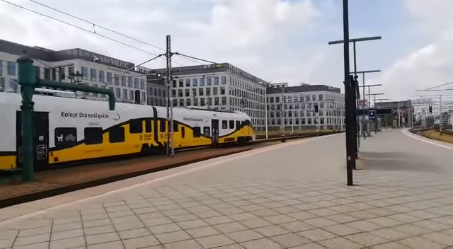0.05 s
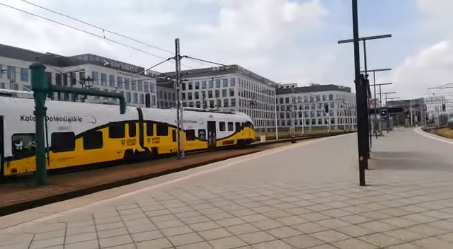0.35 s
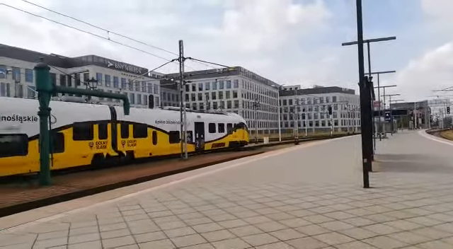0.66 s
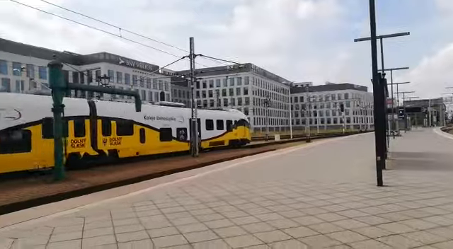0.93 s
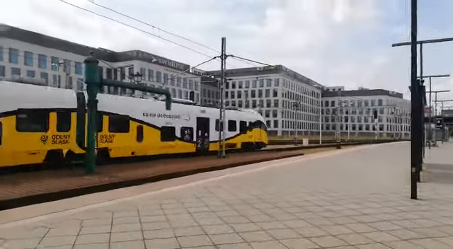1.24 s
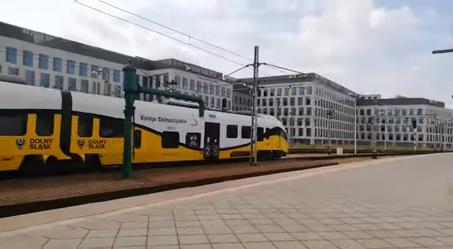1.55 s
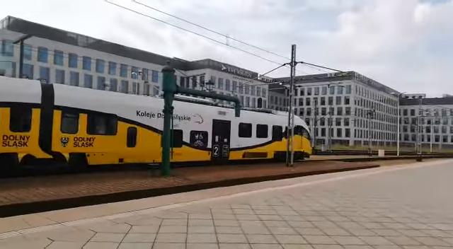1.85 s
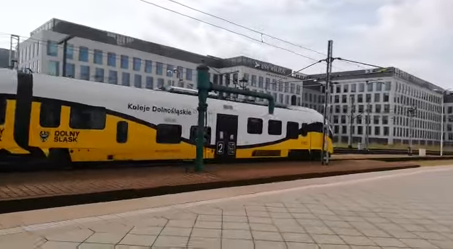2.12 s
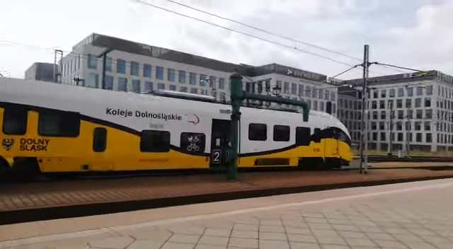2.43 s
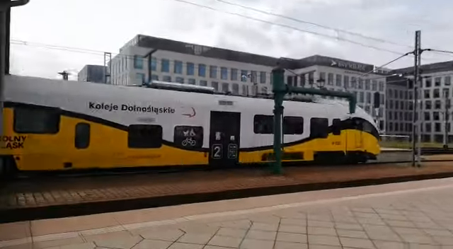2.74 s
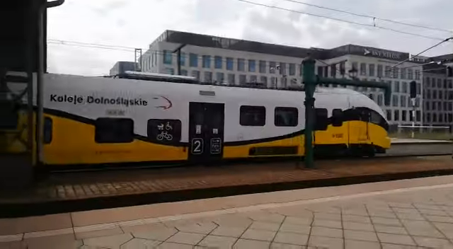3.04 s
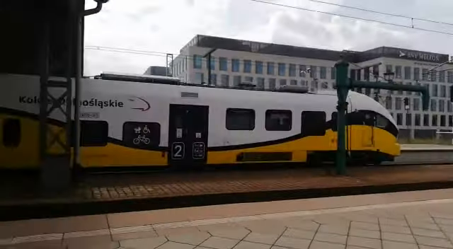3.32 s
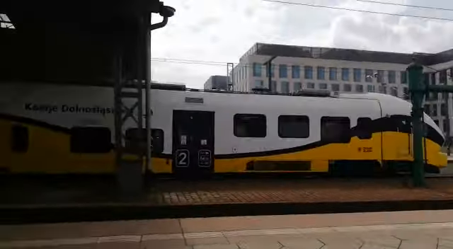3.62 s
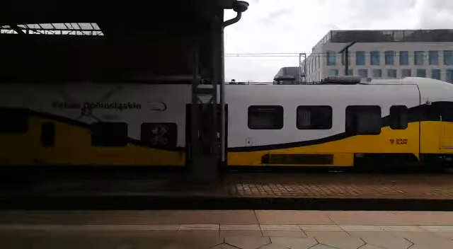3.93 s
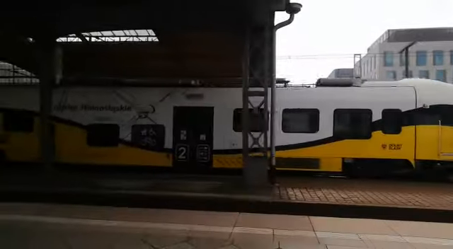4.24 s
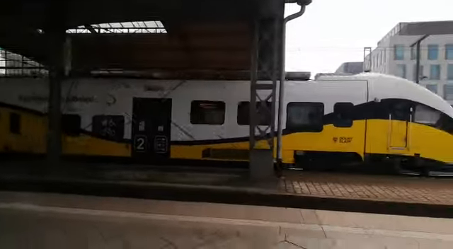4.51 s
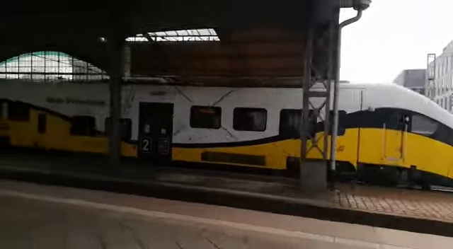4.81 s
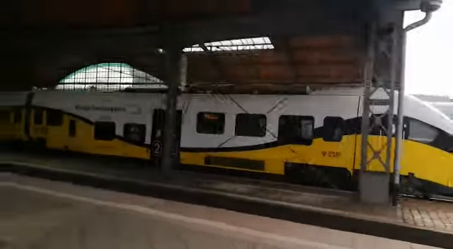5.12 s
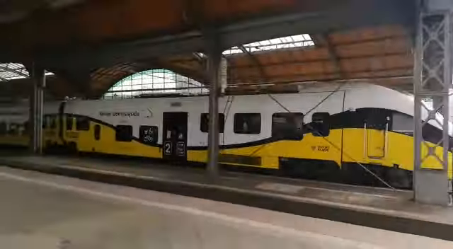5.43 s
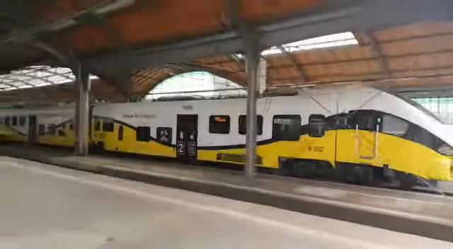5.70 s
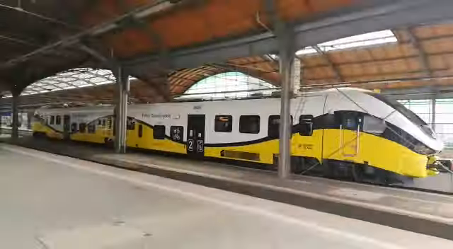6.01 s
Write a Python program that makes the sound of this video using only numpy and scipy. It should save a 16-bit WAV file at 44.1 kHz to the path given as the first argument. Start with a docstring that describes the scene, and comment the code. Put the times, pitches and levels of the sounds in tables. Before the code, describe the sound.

An electric train rolls slowly past a station platform, with a steady low rumble and a faint hum and whine throughout. At about 0.1 seconds a loud blast of compressed air hisses with a high metallic squeal, lasting until 0.5. A weaker, short burst comes around 1 second. Another strong blast runs from 1.8 to 2.3 seconds, with squeals shifting in pitch, followed by a quick burst at 2.5. The longest blast lasts from 2.7 to 3.3 seconds, hissing and squealing on several high tones. Each one echoes for about a second in the hall, and the rumble dips beneath it, then comes back. Two soft, dull jolts follow at about 3.7 and 4 seconds. The rumble carries on evenly to the end, a little after 6 seconds, with one tiny, faint spit of air at 5.5.

```python
"""Train venting air in a station

An electric train rolls slowly past a platform into a hall, with a steady rumble and a faint whine.
A valve vents compressed air in short blasts: the turbulent jet hisses and drives the outlet pipe,
which squeals on overtones about 1 kHz apart. The hall reverberates after each blast, and an
automatic gain control ducks the rumble under it."""
import sys
import numpy as np
from scipy import signal
from scipy.fft import rfft, irfft, next_fast_len
from scipy.io import wavfile
from scipy.ndimage import uniform_filter1d

SR = 44100
rng = np.random.default_rng(int(sys.argv[2]) if len(sys.argv) > 2 else 0)


def waveform_to_disk(signal):
    """Save audio, clipped to [-1, 1], as 16-bit WAV at the path in sys.argv[1]."""
    frames = np.transpose(np.atleast_2d(signal))
    scaled = np.clip(frames, -1, 1) * 32767
    samples = np.round(scaled).astype(np.int16)
    wavfile.write(sys.argv[1], SR, samples)


N = 275977
TIME = np.arange(N) / SR

# Noise of wheels, motors and fans: (frequency [Hz], relative spectral density [dB])
RUMBLE_SPECTRUM = [(14, -42), (24, -21), (42, 1), (136, -3.5), (178, -1), (483, -13.5), (668, -11.5),
                   (1180, -8.5), (1870, -14), (2580, -14.5), (3770, -12.5), (5080, -16), (6480, -27.5),
                   (8730, -26), (11500, -42), (15400, -51)]
# Hum and whine of the drive and running gear: (frequency [Hz], bandwidth [Hz], level [dB])
DRIVE_RESONANCES = [(170.4, 66, -36), (300.8, 84, -39.5), (716.5, 310, -41), (1192, 44, -41),
                    (2030, 310, -41)]
# Jolts on uneven track: (mid time [s], centre frequency [Hz], level [dB])
TRACK_JOLTS = [(3.72, 150, -30.5), (3.96, 796, -31.5)]
# Reverberation of the hall: (frequency [Hz], time to decay by 60 dB [s])
HALL_DECAY = [(500, 1.68), (2000, 1.26), (5000, 0.97), (9000, 0.86), (14000, 0.55)]
# Low resonances set off by some blasts: (start [s], end [s], frequency [Hz], level [dB])
LOW_RESONANCES = [(1.027, 1.485, 2370, -26.5), (2.12, 2.27, 1234, -18), (2.47, 2.68, 999, -24)]
# Modes of the valve's housing: (frequency [Hz], bandwidth [Hz], level re flow [dB])
HOUSING_MODES = [(1183, 136, -26.5), (2360, 240, -26.5)]
# Blasts of air: (opening [s], shutting [s], first level [dB], last level [dB], rise time [s],
# pipe excitation re flow [dB], pipe tuning [cents], left minus right [dB])
AIR_BLASTS = [(.124, 0.472, 1.5, -5, 0.027, -2.5, 13, -0.5), (0.921, .961, -19, -28, 0.014, 3, 10, 3),
              (1.025, 1.151, -5, -6, 0.03, -3.5, -8.5, 6), (1.833, 2.303, 2, -3.5, 0.046, 2.5, 13, -0.5),
              (2.445, 2.534, -2, -4, 0.026, 3.5, 5, 0), (2.741, 3.347, 4, -3, 0.061, -1, -1, -1),
              (5.491, 5.514, -22, -21, 0.0036, 6, 5.5, -0.5)]
# Hiss of the free jet: (frequency [Hz], relative spectral density [dB])
JET_SPECTRUM = [(200, -63), (700, -24), (1650, -16), (2150, -2), (2850, -7), (3400, -4.5), (4200, 0.5),
                (5200, 3), (6500, -9), (8500, -5), (9700, -5), (10700, -22), (12700, -23), (15000, -26)]
# Overtones 1 to 14 of the outlet pipe: (frequency [Hz])
OVERTONE_HZ = [1015, 2035, 3050, 3955, 4985, 6025, 7050, 8120, 9130, 10150, 11210, 12090, 13150, 14200]
# Strength of those overtones: (relative level [dB])
OVERTONE_DB = [-14, -12.5, -10, -5, -0.5, -1.5, -2, 1, -0.5, -14, -14.5, -22, -14, -20]
# Strongest squeals: (start [s], end [s], overtone [number], relative level [dB], left minus right [dB])
PIPE_SQUEALS = [(0.12, 0.235, 8, -4, -19), (1.038, 1.197, 9, -2, 6.5), (1.842, 1.96, 5, -3, -9),
                (1.947, 2.183, 4, -5, -10), (2.098, 2.329, 7, -2, -5), (2.743, 3.333, 5, -6, -3.5),
                (2.836, 3.287, 9, -9.5, 0), (3.184, 3.29, 6, -11.5, 8)]
# Likeness of the train's sound at the two microphone ports: (frequency [Hz], coherence [0-1])
PORT_COHERENCE = [(61, 1), (131, 0.97), (291, 0.89), (601, 0.3), (1401, 0.35), (3001, 0.42), (9000, 0)]
# Unequal response of the ports: (frequency [Hz], left minus right [dB])
PORT_BALANCE = [(111, -.1), (381, -.9), (701, 3.5), (1291, -2), (2381, -5), (4401, -10.5), (6001, -6.5),
                (7501, 2.5), (9301, 0), (12001, -0.5), (14501, -19)]


def amp(db):
    """Amplitude ratio of a level in decibels."""
    return 10 ** (np.asarray(db) / 20)


def unit_rms(x):
    """Normalisation to an rms of 1."""
    return x / np.sqrt(np.mean(x ** 2) + 1e-20)


def curve_at(points, hz):
    """Interpolation of a table on a logarithmic frequency axis."""
    f, value = np.transpose(points)
    return np.interp(np.log(hz + 1), np.log(f + 1), value)


def filtered(x, gain):
    """Linear filtering: the spectrum is multiplied by gain(frequency)."""
    size = next_fast_len(N + 4096)
    return irfft(rfft(x, size) * gain(np.fft.rfftfreq(size, 1 / SR)), size)[..., :N]


def coloured_noise(gain):
    """Spectral shaping of white noise, at rms 1."""
    return unit_rms(filtered(rng.standard_normal(N), gain))


def drift(rate_hz):
    """Random fluctuation: low-pass noise of rms 1."""
    return coloured_noise(lambda f: 1 / (1 + (f / rate_hz) ** 4))


def resonance(hz, width_hz):
    """Random excitation of a resonance that may glide; the width lies between the -6 dB points."""
    phase = 2 * np.pi * np.cumsum(hz * np.ones(N)) / SR
    pole = np.exp(-np.pi * abs(width_hz) / SR)
    envelope = signal.lfilter([1], [1, -2 * pole, pole * pole], rng.standard_normal((2, N)))
    return unit_rms(envelope[0] * np.cos(phase) + envelope[1] * np.sin(phase))


def whistle(hz, waver_hz=35, shake_db=3.5):
    """Random frequency and amplitude modulation of a sine tone."""
    phase = 2 * np.pi * np.cumsum(hz + waver_hz * drift(85)) / SR
    return np.sqrt(2) * np.sin(phase) * amp(shake_db * drift(32))


def swell(start, end):
    """Amplitude envelope with a rounded rise and fall."""
    return np.sqrt(np.sin(np.pi * np.clip((TIME - start) / (end - start), 0, 1)).clip(0))


def placed(x, lag_s=0., balance_db=0.):
    """Localisation by time and level difference; the right port lags."""
    return np.array([x * amp(balance_db / 2), np.interp(TIME - lag_s, TIME, x) * amp(-balance_db / 2)])


def rolling(level_db=-25.5, abreast_s=4.2, speed_m_per_s=3.2, distance_m=14, patchy_db=0.86,
            throb_db=0.13):
    """Cylindrical spreading: above a low rumble, the wheels' roar falls off as from a line source."""
    frames, hz = N // 256 + 5, np.fft.rfftfreq(1024, 1 / SR)
    left_re, left_im, other_re, other_im, patches = rng.standard_normal((5, frames, len(hz)))
    t = np.arange(frames) * 256 / SR
    range_ratio = np.hypot(1, speed_m_per_s * (t - abreast_s) / distance_m)
    roar_db = -1.15 - 10 * np.log10(range_ratio)
    treble = hz ** 2 / (hz ** 2 + 450 ** 2)
    field_db = np.outer(roar_db, treble)
    field_db += patchy_db * unit_rms(uniform_filter1d(uniform_filter1d(patches, 12, 0), 10, 1))
    field_db += throb_db * np.outer(np.interp(t, TIME, drift(9.9)), 1 - treble)
    lead = 2 * np.pi * hz * (hz > 300) * 26 / SR  # the roar reaches the right port 26 samples early
    coherence = np.clip(curve_at(PORT_COHERENCE, hz), 0, .999)
    left, other = left_re + 1j * left_im, other_re + 1j * other_im
    right = (coherence * left + np.sqrt(1 - coherence ** 2) * other) * np.exp(1j * lead)
    spectra = np.array([left, right]) / np.sqrt(1 + coherence * np.cos(lead)) * amp(field_db)
    noise = signal.istft(spectra, nperseg=1024, noverlap=768, time_axis=1, freq_axis=2)[1][:, :N]
    noise = filtered(noise, lambda f: amp(curve_at(RUMBLE_SPECTRUM, f)))
    return amp(level_db) * noise / noise.mean(0).std()


def drive():
    """Resonance of the drive and running gear; only the low hum is coherent between the ports."""
    out = np.zeros((2, N))
    for hz, width, db in DRIVE_RESONANCES:
        coherence = np.clip(curve_at(PORT_COHERENCE, hz), 0, 1) * (hz < 400)
        left, other = resonance(hz, width), resonance(hz, width)
        out += amp(db) * np.array([left, coherence * left + np.sqrt(1 - coherence ** 2) * other])
    return out


def jolts(length_s=.14, relative_width=1.1):
    """Transient excitation: uneven track jolts the running gear into dull surges of noise."""
    return sum(amp(db) * swell(s - length_s / 2, s + length_s / 2) * resonance(hz, relative_width * hz)
               for s, hz, db in TRACK_JOLTS)


def hall(x, delay_s=0.0068):
    """Reverberation: dense reflections from roof, platform and train decay, the treble first."""
    hz, t, spectra = signal.stft(rng.standard_normal((2, SR * 3 // 2)), SR, nperseg=256)
    decay = 1000 ** (-t / curve_at(HALL_DECAY, hz)[:, None])
    tail = signal.istft(spectra * decay, SR, nperseg=256)[1]
    tail *= np.clip(np.arange(tail.shape[1]) / SR / delay_s - 1, 0, 1)
    return signal.fftconvolve(x, tail / np.linalg.norm(tail[0]), axes=1)[:, :N]


def low_notes(relative_width=0.066):
    """Diffuse arrival: short, fuzzy resonances reach the two ports uncorrelated."""
    return sum(amp(db) * swell(start, end)
               * np.array([resonance(hz, relative_width * hz) for _ in range(2)])
               for start, end, hz, db in LOW_RESONANCES)


def housing(flow):
    """Forced vibration: the valve's housing rings while air flows."""
    return flow * sum(amp(db) * resonance(hz, width) for hz, width, db in HOUSING_MODES)


def valve(shut_s=0.0083, sag_cents_per_s=13):
    """Exponential rise and decay of the flow at each blast, during which the pipe's pitch sags."""
    flow, excitation, cents, side_db = np.zeros((4, N))
    for opens, shuts, first_db, last_db, rise_s, pipe_db, tuning, balance_db in AIR_BLASTS:
        opening = 1 - np.exp(-np.maximum(TIME - opens, 0) / rise_s)
        closing = np.exp(-np.maximum(TIME - shuts, 0) / shut_s)
        blast = opening * closing * amp(np.interp(TIME, [opens, shuts], [first_db, last_db]))
        flow += blast
        excitation += blast * amp(pipe_db)
        cents = np.where(TIME >= opens, tuning - sag_cents_per_s * (TIME - opens), cents)
        side_db = np.where(TIME >= opens, balance_db, side_db)
    return flow, excitation, 2 ** (cents / 1200), side_db


def onsets(fade_s):
    """Onset transients: a unit step at each opening of the valve decays exponentially."""
    return sum((TIME > opens) * np.exp(-abs(TIME - opens) / fade_s) for opens, *_ in AIR_BLASTS)


def jet(flow, hiss_db=-3.5, flutter_db=1.04, spit_db=-15, spit_s=0.048):
    """Turbulence radiates a broadband hiss, with a bright spit as the valve cracks open."""
    hiss = coloured_noise(lambda f: amp(curve_at(JET_SPECTRUM, f)))
    spit = coloured_noise(lambda f: f ** 2 / (f ** 2 + 6100 ** 2))
    flutter = amp(flutter_db * drift(28))
    return flow * flutter * (amp(hiss_db) * hiss + amp(spit_db) * onsets(spit_s) * spit)


def pipe(excitation, pitch, level_db=-9.5, width_hz=145, bright_db=8, bright_s=0.08, bright_hz=9500):
    """Air-column resonance: the jet excites the pipe's modes, the top ones harder as the valve opens."""
    lift_db = bright_db * onsets(bright_s)
    modes = sum(amp(db + lift_db * (hz > bright_hz)) * resonance(hz * pitch, width_hz)
                for hz, db in zip(OVERTONE_HZ, OVERTONE_DB))
    return amp(level_db) * excitation * unit_rms(modes)


def squeals(flow, pitch, level_db=-5.5, flare_db=-18, spread_db=5.5, flare_rate_hz=3.2):
    """Lock-in of the jet to single overtones: strong squeals over chance flares of overtones 4 to 10."""
    out = np.zeros((2, N))
    for start, end, overtone, db, balance_db in PIPE_SQUEALS:
        tone = whistle(OVERTONE_HZ[overtone - 1] * pitch)
        out += placed(amp(db) * swell(start, end) * tone, balance_db=balance_db)
    for hz in OVERTONE_HZ[3:10]:
        out += amp(flare_db + spread_db * np.tanh(drift(flare_rate_hz))) * whistle(hz * pitch)
    return amp(level_db) * flow * out


def scene(hiss_echo_db=-5, tones_direct_db=-3.5, lag_s=12 / SR):
    """Superposition of train and blasts; the hiss beams at the platform, the pipe fills the hall."""
    flow, excitation, pitch, side_db = valve()
    hiss = placed(jet(flow), lag_s, side_db)
    tones = placed(pipe(excitation, pitch) + housing(flow), lag_s, side_db) + squeals(flow, pitch)
    echo = hall(amp(hiss_echo_db) * hiss + tones)
    return rolling() + drive() + jolts() + low_notes() + hiss + amp(tones_direct_db) * tones + echo


def record(dry, threshold_db=-15.0, ratio=7, recovery_db_per_s=28, attack_s=0.0061, cutoff_hz=15700):
    """Compression: behind unequal ports the gain falls fast and recovers slowly; a low-pass follows."""
    x = filtered(dry, lambda f: np.sqrt(2 / (1 + amp(np.outer([-2, 2], curve_at(PORT_BALANCE, f))))))
    pole = np.exp(-1 / (attack_s * SR))
    power_db = 10 * np.log10(signal.lfilter([1 - pole], [1, -pole], (x ** 2).mean(0)) + 1e-12)
    wanted_db = np.maximum(power_db - threshold_db, 0) * (1 - 1 / ratio)
    recovery_db = TIME * recovery_db_per_s
    duck_db = np.maximum.accumulate(wanted_db + recovery_db) - recovery_db
    x = x * amp(-uniform_filter1d(duck_db, size=128))
    low_pass = signal.firwin(511, cutoff_hz, window=("kaiser", 9), fs=SR)
    return signal.oaconvolve(x, low_pass[None], "same")


dry = scene()
out = record(dry)
waveform_to_disk(out)
```